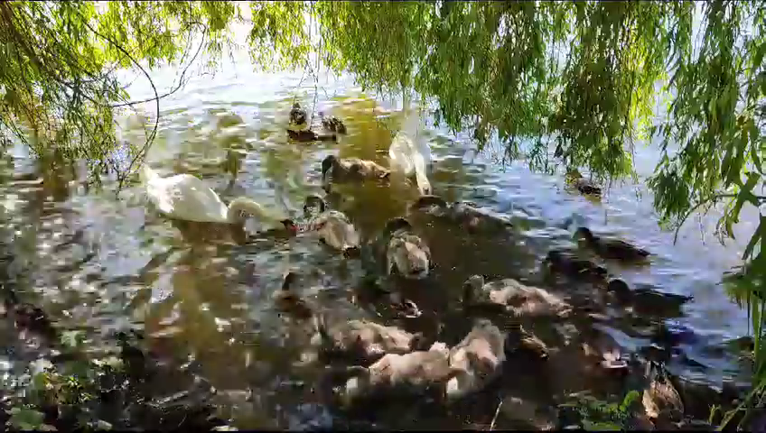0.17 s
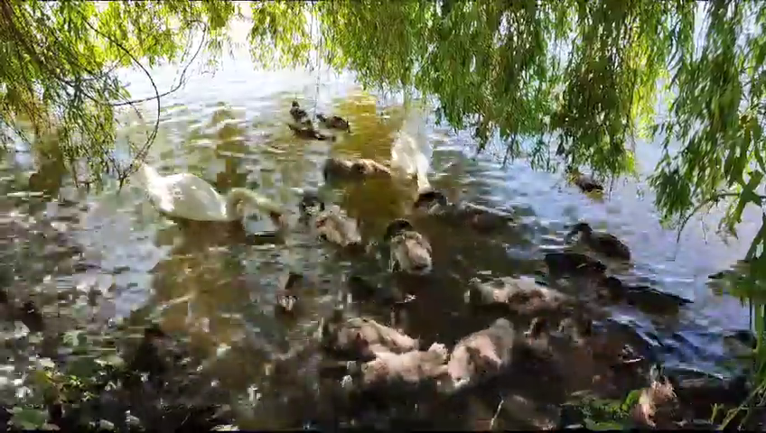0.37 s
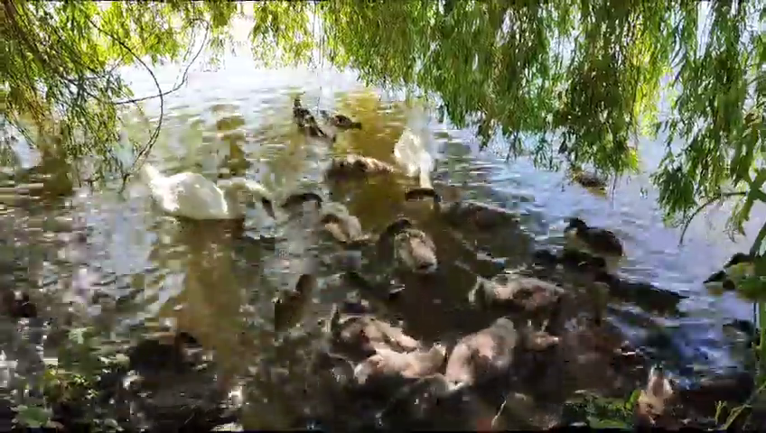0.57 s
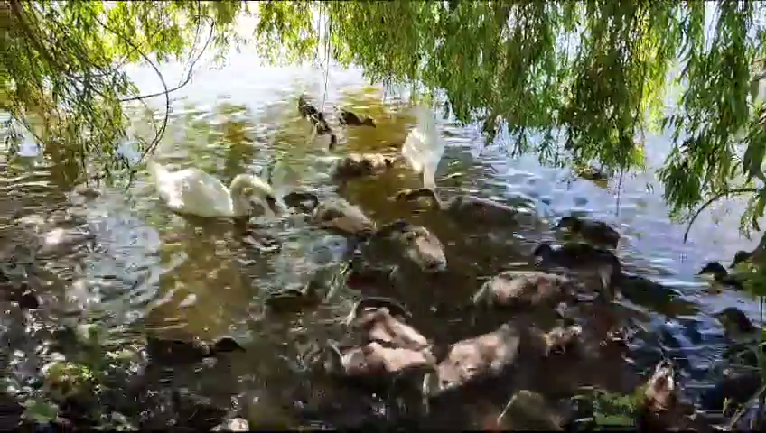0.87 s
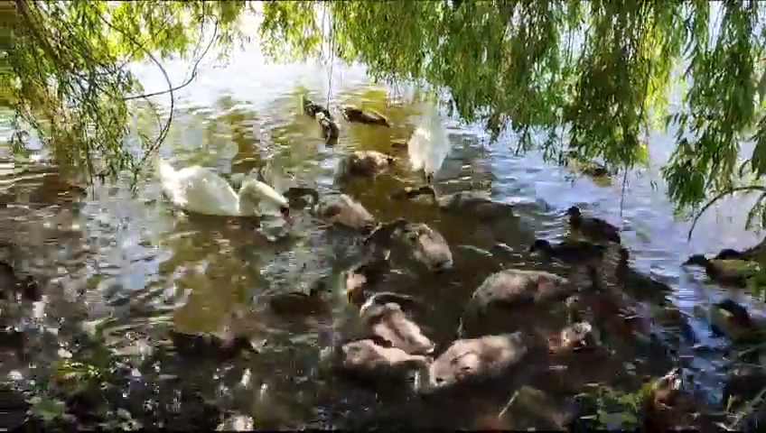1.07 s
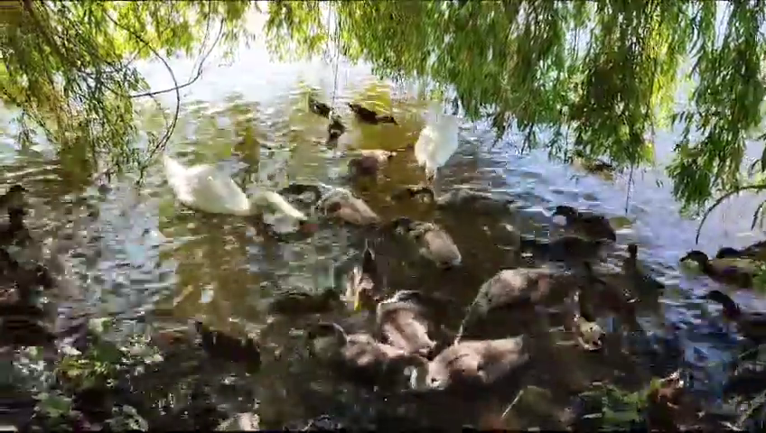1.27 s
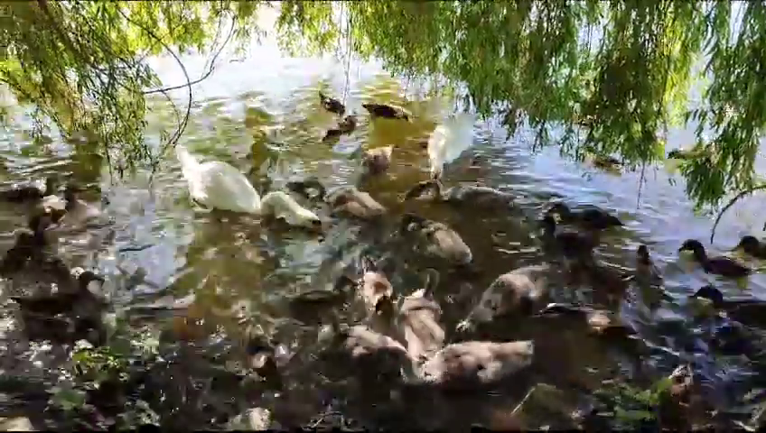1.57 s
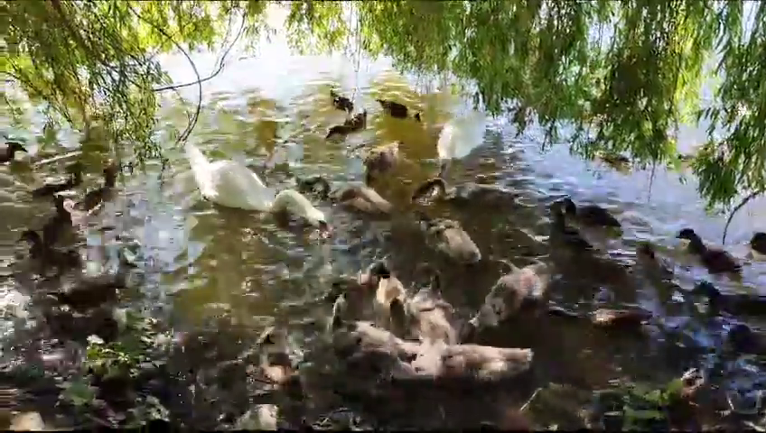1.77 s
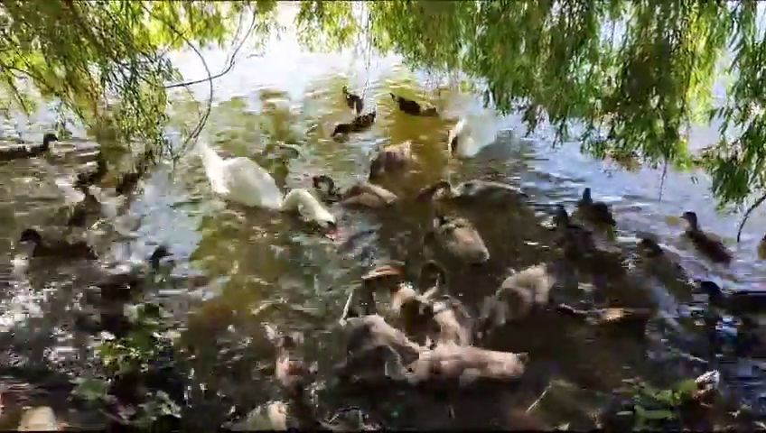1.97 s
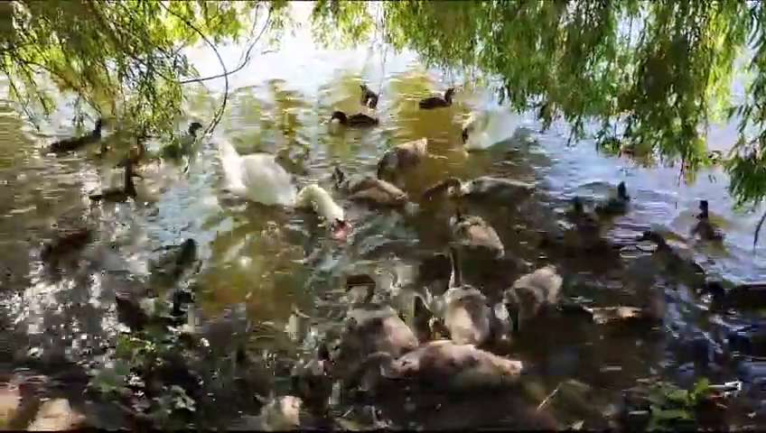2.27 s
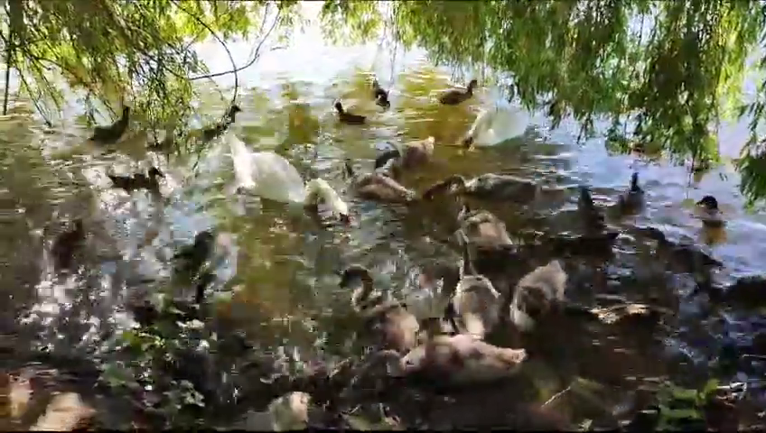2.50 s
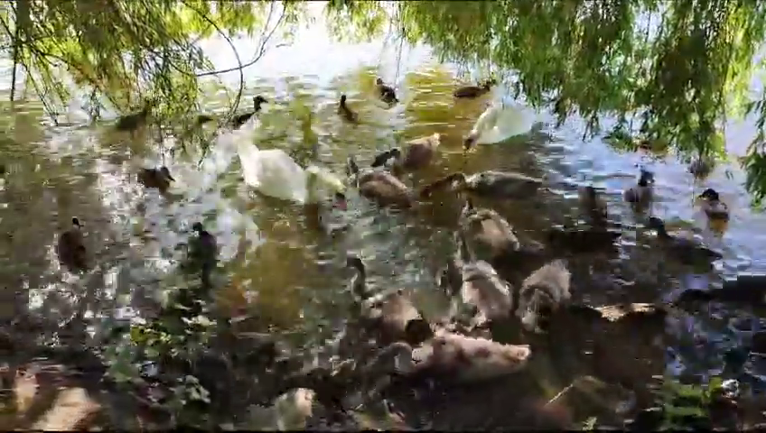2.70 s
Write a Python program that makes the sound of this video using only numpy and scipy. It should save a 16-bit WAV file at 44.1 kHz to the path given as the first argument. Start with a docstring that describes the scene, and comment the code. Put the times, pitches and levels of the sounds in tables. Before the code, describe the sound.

Water splashing and pattering as swans and ducks feed in the shallows, with faint peeps and grunts

```python
"""Swans and ducks feed in shallow water at a bank, heard in stereo.
After a short silence the sound fades in: a dense patter of decaying bubble tones over a wash of shaped
noise and a rumble of fuzzy tones. Splashes (resonated noise specks) and plops (single bubbles) stand out
from the start; then a small bird chirps and cygnets peep (gliding near-sines), and a duck grunts softly
(pulses through resonances). Scattered echoes from the bank follow the near sounds."""
import sys
import numpy as np
from scipy import signal
from scipy.io import wavfile
from scipy.ndimage import uniform_filter1d

SR = 44100
rng = np.random.default_rng(int(sys.argv[2]) if len(sys.argv) > 2 else 0)


def unload_audio(sound):
    """Save the sound as a 16-bit wav file, at the path given as the first command line argument."""
    columns = np.transpose(np.atleast_2d(sound))
    # keep every value between -1 and 1, then stretch to whole-number steps
    steps = np.round(np.clip(columns, -1, 1) * 32767)
    wavfile.write(sys.argv[1], SR, steps.astype(np.int16))


N = 125244


def amp(db):
    """Decibels are twenty times the logarithm of an amplitude ratio."""
    return 10 ** (np.asarray(db) / 20)


def evened(x):
    """Division by the root mean square gives unit mean power."""
    return x / np.sqrt(np.mean(x ** 2) + 1e-20)


def read(points, hz):
    """Spectral curves are interpolated on a logarithmic frequency axis."""
    f, value = np.transpose(points)
    return np.interp(np.log(hz + 1), np.log(f + 1), value)


def add(mix, s, sound, pan_db, lag_ms):
    """Level and arrival-time differences between the channels give direction."""
    for side, sign in enumerate((1, -1)):
        start = round((s + sign * lag_ms / 2000) * SR)
        part = mix[side, start:][:len(sound)]
        part += amp(sign * pan_db / 2) * sound[:len(part)]


def resonate(x, hz, width):
    """A resonance of gain 1: shift its pitch to zero, smooth with one pole, shift back."""
    turn = np.exp(2j * np.pi * np.cumsum(hz * np.ones(len(x))) / SR)
    r = np.exp(-np.pi * width / SR)
    return 2 * (turn * signal.lfilter([1 - r], [1, -r], x / turn)).real


def drift(count, size):
    """Noise averaged twice leaves only a slow random wander, of unit mean power."""
    return evened(uniform_filter1d(uniform_filter1d(rng.standard_normal(count), size), size))


def bubble(hz, cycles, glide):
    """A damped oscillator: the tone dies exponentially while its pitch rises."""
    u = np.arange(int(3 * cycles * SR / hz)) * hz / SR / cycles  # time in units of the given cycles
    envelope = np.minimum(u * cycles / 1.42, 1) * np.exp(-2 * u)
    return envelope * np.sin(2 * np.pi * cycles * (u + glide * u ** 2 / 2))


def patter():
    """Random impulses excite damped bubbles: many drops in clumps, each pitch from its own direction."""
    # Weight of drops by pitch: (pitch [Hz], level [dB])
    pitch_levels = [(500, -11), (1200, 0.5), (2400, 4), (5000, 7), (9000, 6.5), (15000, -11)]
    # Decay lengths of tick, crackle, fizz and bubble: (length [cycles])
    decay_cycles = (.6, 1.3, 2.8, 6.9)
    level_db, drops_per_s, spread_db, clump_db, glide = -51.5, 4500, 4.2, 2.8, 0.14
    size_db = spread_db * np.minimum(rng.exponential(1, N), 3.6) + clump_db * drift(count=N, size=110)
    impulses = amp(size_db) * (rng.random(N) < drops_per_s / SR)
    pitches = np.geomspace(500, 15000, 120)
    kind = rng.integers(0, len(pitches), N)
    lags_ms = rng.uniform(-.4, .4, len(pitches))
    out = np.zeros((2, N))
    for k, (hz, lag_ms) in enumerate(zip(pitches, lags_ms)):
        cycles = decay_cycles[k % len(decay_cycles)]
        drop = amp(read(pitch_levels, hz)) * bubble(hz, cycles, glide) / np.sqrt(cycles)
        drops = signal.oaconvolve(impulses * (kind == k), drop)
        add(out, .001, drops, 8 * lag_ms, lag_ms)
    return amp(level_db) * evened(out)


def splashes():
    """Filtered shot noise: a quick dying cluster of specks rings three broad bands."""
    # Splashes: (start [s], level [dB], low band [dB], high band [dB], decay time constant [s])
    events = [(0.122, -29.5, -13, -29, 0.0079), (0.192, -32.5, -20, -19, 0.0099),
              (0.228, -39, -6.5, -10, 0.014), (0.292, -39, -21, -8, 0.0047),
              (0.3264, -34.5, -6, -11, 0.0078), (0.5574, -34.5, -10, -7.5, 0.0027),
              (0.668, -34, -16, -18, 0.0068), (0.756, -31, -11, -17, 0.0023),
              (0.8422, -30, -13, -18, 0.0093), (1.008, -35.5, -3.5, -25, 0.0062),
              (1.0917, -25, -17, -16, 0.0036), (1.2365, -24.5, -8, -41, 0.0055),
              (1.379, -39, 2, -25, 0.0049), (1.4955, -26, -7.5, -35, 0.0035),
              (1.5226, -28.5, -6.5, -22, 0.0033), (1.684, -34, -10, -25, 0.0067),
              (1.7, -29.5, -9, -31, 0.0045), (1.7845, -30, -10, -15, 0.0036),
              (2.057, -26.5, -12, -23, 0.0041), (2.104, -31, -16, -37, 0.0096),
              (2.263, -30.5, -2, -10.5, 0.0033), (2.306, -29, -6, -36, 0.0055),
              (2.739, -30.5, -23, -18, 0.0061)]
    # Low, middle and high band: (centre [Hz], width of each of two passes [Hz])
    bands = [(1900, 1480), (4800, 3800), (10000, 10000)]
    specks_per_s, middle_db, rise_s = 2300, -11, 0.0022
    out, t = np.zeros((2, N)), np.arange(1500) / SR
    for s, db, low_db, high_db, decay_s in events:
        chance = rng.random((3, len(t))) < specks_per_s / SR
        specks = rng.standard_normal((3, len(t))) * (0.14 + chance)  # 0.14: weak noise between specks
        fall = np.minimum(t / rise_s, 1) * np.exp(-t / decay_s)
        spray = 0
        for x, band_db, (hz, width) in zip(specks, (low_db, middle_db, high_db), bands):
            spray = spray + amp(band_db) * evened(resonate(resonate(x, hz, width), hz, width))
        side = rng.uniform(-1, 1)
        add(out, s, amp(db) * fall * spray, 2.5 * side, .3 * side)
    return out


def plops():
    """Each plop is one bubble, a lightly damped oscillator of rising pitch."""
    # Plops: (start [s], level [dB], starting pitch [Hz])
    events = [(0.2568, -38.5, 1075), (0.357, -35.5, 2860), (0.4823, -32, 4100), (0.5097, -37, 1590),
              (0.953, -35, 1500), (1.0774, -38.5, 1490), (1.63, -31.5, 4030), (1.686, -36.5, 1810),
              (1.943, -31.5, 3460), (2.06, -35, 1580), (2.155, -35, 2000), (2.470, -37.5, 1040),
              (2.565, -38.5, 3040), (2.6596, -37, 1660)]
    out = np.zeros((2, N))
    for s, db, hz in events:
        add(out, s, amp(db) * bubble(hz, cycles=8.9, glide=0.11), 0, rng.uniform(-.1, .1))
    return out


def whistle(hz, db, overtone_db, waver):
    """Frequency modulation of a near-sine with soft edges, an octave overtone and a wavering level."""
    edge_s, flicker_db = .009, 2.5
    t = np.arange(len(hz)) / SR
    from_end = np.minimum(t, t[::-1])
    edge = np.sin(np.pi / 2 * np.clip(from_end / min(edge_s, t[-1] / 3), 0, 1)) ** 2
    phase = 2 * np.pi * np.cumsum(hz * (1 + waver * drift(count=len(hz), size=150))) / SR
    level = np.sqrt(2) * amp(db + flicker_db * drift(count=len(hz), size=300))
    return level * edge * (np.sin(phase) + amp(overtone_db) * np.sin(2 * phase))


def peeps():
    """Cygnets' calls: pitch follows an arch, and the level swells with it."""
    # Peeps: (start [s], length [s], first pitch [Hz], top pitch [Hz], last pitch [Hz],
    # place of top [0-1], level [dB], left minus right [dB], left lag [ms])
    calls = [(1.332, 0.09, 2170, 2373, 2220, 0.6, -49, 2.5, .06),
             (1.574, 0.12, 2220, 2510, 2155, 0.59, -52, 6, .08),
             (1.71, 0.062, 2190, 2260, 2200, 0.57, -64, 11, .08),
             (1.852, 0.138, 2105, 2605, 2090, 0.63, -53, 2.5, .08),
             (2.08, 0.046, 2240, 2186, 2150, 0.47, -59, 4, .05),
             (2.19, 0.063, 2514, 2674, 2520, .5, -57, -6, .09),
             (2.445, .038, 2060, 2290, 2280, 0.7, -54, 3, .11),
             (2.497, 0.046, 2420, 2480, 2330, 0.4, -55, -3, .11)]
    overtone_db, waver, arch_power, swell_db = -16, .003, 1.3, 1.5
    out = np.zeros((2, N))
    for s, length, first_hz, top_hz, last_hz, place, db, pan_db, lag_ms in calls:
        u = np.linspace(0, 1, int(length * SR))
        arch = np.sin(np.pi * u ** (np.log(.5) / np.log(place)))  # crest falls at u = place
        end_hz = np.where(u < place, first_hz, last_hz)
        hz = end_hz + (top_hz - end_hz) * np.abs(arch) ** arch_power
        add(out, s, whistle(hz, db + swell_db * (arch - .7), overtone_db, waver), pan_db, lag_ms)
    return out


def chirps():
    """A small bird's calls: linear frequency glides with a random flutter."""
    # Chirps: (start [s], length [s], first pitch [Hz], last pitch [Hz], level [dB],
    # left minus right [dB], flutter [share of pitch])
    calls = [(0.96, 0.05, 6130, 6190, -58, 2, .003), (1.30, .07, 4700, 4300, -58.5, -7, .04),
             (1.52, .055, 1200, 1140, -58, 0, .015), (2.027, 0.014, 4800, 4100, -58, -8, .01),
             (2.036, .084, 4300, 4620, -56.5, -13.5, .014), (2.445, 0.032, 4680, 4150, -54.5, -12, .012)]
    out = np.zeros((2, N))
    for s, length, first_hz, last_hz, db, pan_db, flutter in calls:
        hz = np.linspace(first_hz, last_hz, int(length * SR))
        add(out, s, whistle(hz, db, -60, flutter), pan_db, .06)
    return out


def grunts():
    """Source and filter: rough pulses drive the opening bill's resonances, over a hum at the pitch."""
    # Grunts: (start [s], length [s], central pitch [Hz], hum level [dB], rasp against hum [dB])
    calls = [(1.498, 0.048, 226, -57.5, -12), (2.013, 0.044, 296, -55, -16), (2.113, 0.062, 252.6, -56, -1),
             (2.207, 0.066, 277.5, -50, 6), (2.306, 0.045, 289.4, -57, 1), (2.37, 0.087, 247.3, -58, -19),
             (2.563, 0.056, 320.5, -55, 7)]
    # Bill resonances at mid-grunt: (multiple of the central pitch [ratio], width [Hz], level [dB])
    resonances = [(3.8, 170, 0), (5, 240, -2), (6.3, 400, -4)]
    pitch_rise, rough, uneven, opening = .15, .72, .35, .3  # shares
    open_db = 8  # each higher resonance grows by this much more as the bill opens
    fade_db = 10  # the rasp dies before the hum
    out = np.zeros((2, N))
    for s, length, hz, db, bright_db in calls:
        u = np.linspace(0, 1, int(length * SR))
        turns = np.cumsum(hz * (1 + pitch_rise * (u ** 2 - .3))) / SR
        folds = sum(np.cos(2 * np.pi * k * turns) for k in range(2, 9))
        puffs = np.exp(-(turns % 1) / 0.74) * rng.standard_normal(len(u))
        drive = (1 - rough) * evened(folds) + rough * evened(puffs)
        drive = drive * (1 + uneven * np.cos(np.pi * turns))  # strong and weak pulses alternate
        rasp = 0
        for k, (multiple, width, gain_db) in enumerate(resonances):
            moving_hz = multiple * hz * (1 + opening * (u - .5))
            gain = (-1) ** k * amp(gain_db + k * open_db * (u - .5))
            rasp = rasp + gain * resonate(drive, moving_hz, width)
        hum = np.sqrt(2) * np.sin(2 * np.pi * turns)
        voice = hum + amp(bright_db - fade_db * (u - 0.43)) * evened(rasp)
        add(out, s, amp(db) * np.sin(np.pi * u) ** 0.61 * voice, 0.5, .15)
    return out


def bank(x):
    """Convolution with sparse, exponentially decaying impulses: echoes from the bank and trees."""
    t60_s, first_echo_s, density = 0.24, .002, .05
    t = np.arange(8000) / SR
    echoes = rng.standard_normal((2, len(t))) * (rng.random((2, len(t))) < density)
    tail = echoes * amp(-60 * t / t60_s) * (t > first_echo_s)
    return signal.fftconvolve(x, tail / np.linalg.norm(tail[0]), axes=1)[:, :N]


def wash():
    """Partly coherent noise shaped in time and frequency: far water and air, most alike in the deep bass."""
    # Relative noise spectrum: (frequency [Hz], level [dB])
    spectrum = [(20, 2.5), (60, 0), (106, -11), (232, -3.5), (667, -8), (881, -14), (1160, -4.5),
                (1670, -5), (2760, -12), (5090, -13), (9200, -18.5), (10500, -24.5), (15500, -22.5)]
    # Likeness of left and right: (frequency [Hz], coherence [0-1])
    likeness = [(60, 0.86), (150, 0.77), (380, 0.66), (950, 0.12), (2380, 0.61), (5980, 0.036),
                (15000, 0.13)]
    # Channel balance: (frequency [Hz], left minus right [dB])
    balance = [(60, 1.5), (240, -1), (950, 3), (3770, -5), (15000, 1)]
    level_db, patch_db = -51, 2.52
    bass_swell_db = 4  # the low murmur of water grows by this over the scene
    frames, hz = N // 256 + 5, np.fft.rfftfreq(1024, 1 / SR)
    a, b, c, d, patches = rng.standard_normal((frames, 513, 5)).T
    patches = evened(uniform_filter1d(uniform_filter1d(patches, 14, 0), 10, 1))
    same = read(likeness, hz)[:, None]
    left, other = a + 1j * b, c + 1j * d
    z = np.array([left, same * left + np.sqrt(1 - same ** 2) * other])
    swell = bass_swell_db * np.outer((hz > 100) & (hz < 450), np.linspace(-.5, .5, frames))
    z *= amp(read(spectrum, hz)[:, None] + patch_db * patches + swell)
    z *= amp(np.outer([.5, -.5], read(balance, hz)))[:, :, None]
    noise = signal.istft(z, nperseg=1024, noverlap=768)[1][:, :N]
    return amp(level_db) * evened(noise)


def rumble():
    """Narrow-band noise and a frequency-wandering sine share each low resonance of a distant drone."""
    # Drone tones: (frequency [Hz], width [Hz], level [dB])
    tones = [(56.7, 8.3, -62.5), (145.6, 9.7, -69.5), (304, 114, -66.5)]
    steady = 1.53  # sine amplitude against fuzz of unit mean power
    out = 0
    for hz, width, db in tones:
        fuzz = evened(resonate(rng.standard_normal(N), hz, width))
        wandering_hz = hz + width / 2 * drift(count=N, size=int(SR / width))
        tone = np.sin(2 * np.pi * np.cumsum(wandering_hz) / SR)
        out = out + amp(db) * evened(fuzz + steady * tone)
    return out


def scene():
    """Superposition: near sounds, their echoes and the background add linearly."""
    # Level course of patter and wash: (time [s], level [dB])
    water_levels = [(.1, -2), (.3, 1.5), (.55, 0), (0.799, 0.5), (1.05, 0.5), (1.18, -1), (1.22, -4.5),
                    (1.26, 1.5), (1.7, 1), (2.0, 1.5), (2.4, 0), (2.84, 1.5)]
    s, db = np.transpose(water_levels)
    level = amp(np.interp(np.arange(N) / SR, s, db))
    near = level * patter() + splashes() + plops() + peeps() + chirps() + grunts()
    bank_db = -8.5
    return near + amp(bank_db) * bank(near) + level * wash() + rumble()


def record(dry):
    """Gain and linear filtering: the input opens, gain climbs as an offset settles, then a band limit."""
    open_s, fade_s, fade_db, edge_hz = .102, 0.18, -11, 15850
    offset_scale, offset_rise_s, offset_fall_s = -0.0065, 0.048, 0.36  # scale in full-scale units
    t = np.maximum(np.arange(N) / SR - open_s, 0)
    gain = (t > 0) * amp(fade_db * np.clip(1 - t / fade_s, 0, 1))
    offset = offset_scale * (np.exp(-t / offset_fall_s) - np.exp(-t / offset_rise_s))
    low_pass = signal.firwin(511, edge_hz, window=("kaiser", 9), fs=SR)
    return signal.oaconvolve(dry * gain + offset, low_pass[None], "same")


dry = scene()
out = record(dry)
unload_audio(out)
```